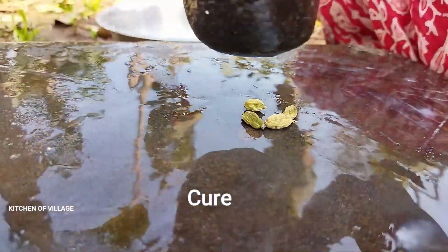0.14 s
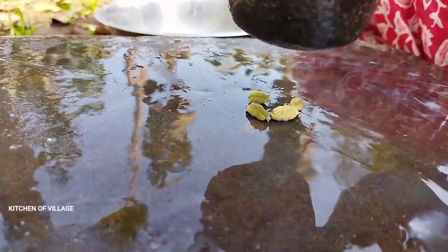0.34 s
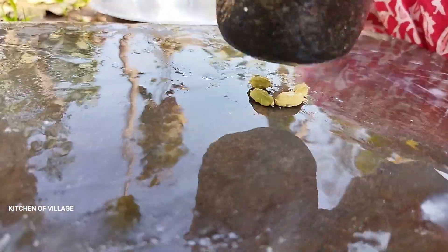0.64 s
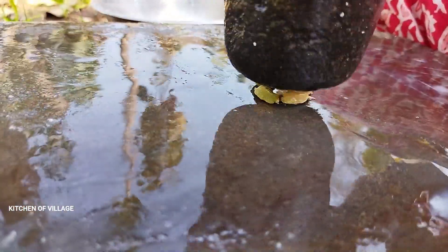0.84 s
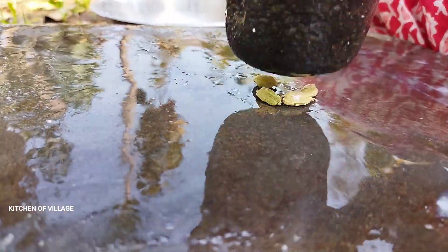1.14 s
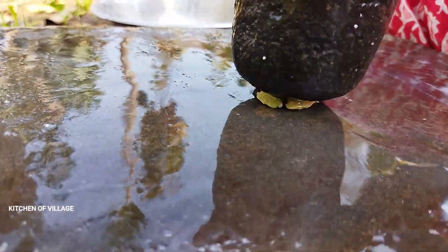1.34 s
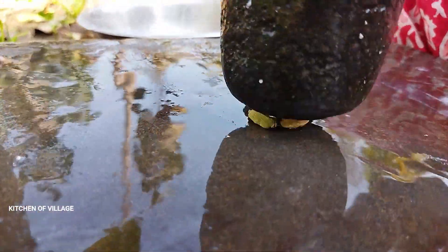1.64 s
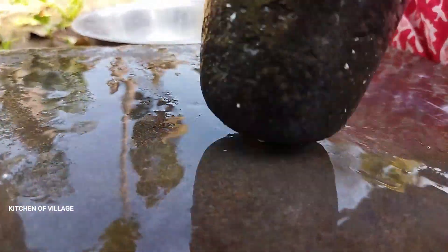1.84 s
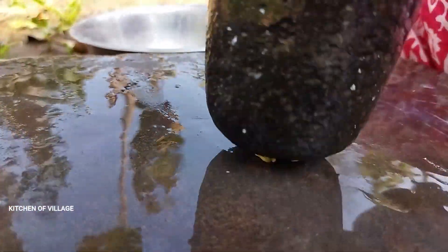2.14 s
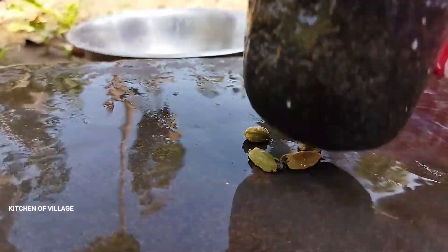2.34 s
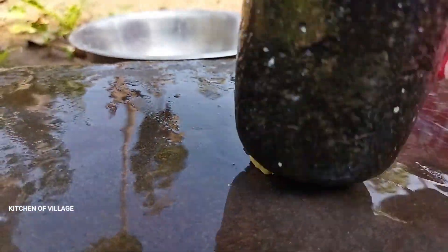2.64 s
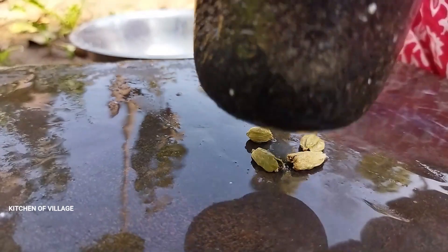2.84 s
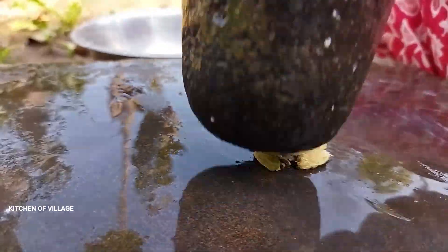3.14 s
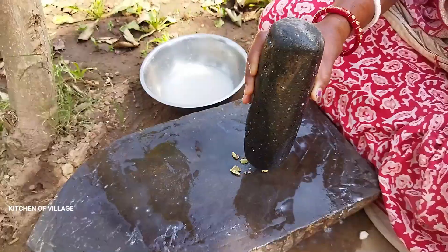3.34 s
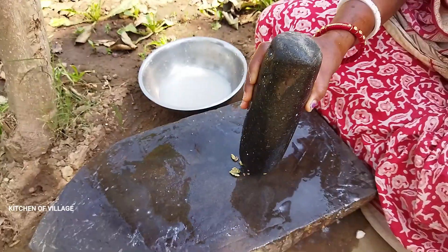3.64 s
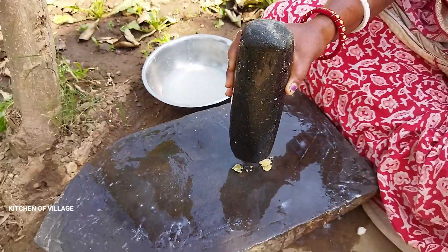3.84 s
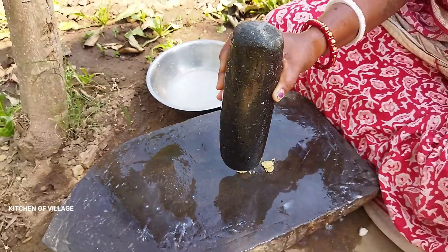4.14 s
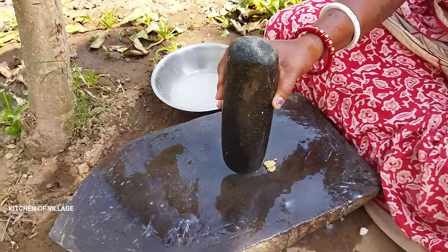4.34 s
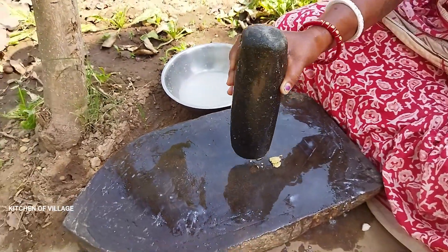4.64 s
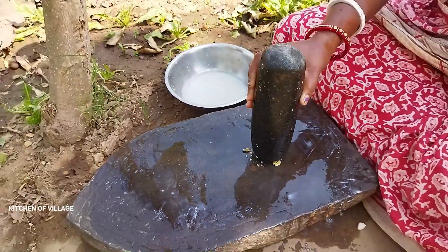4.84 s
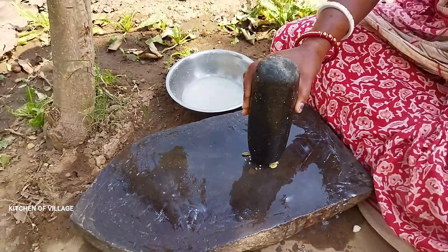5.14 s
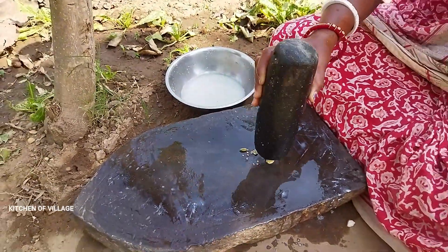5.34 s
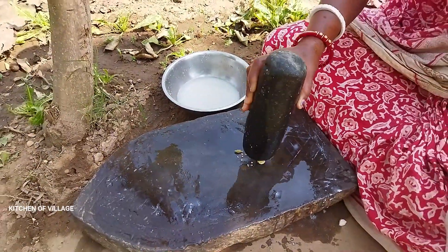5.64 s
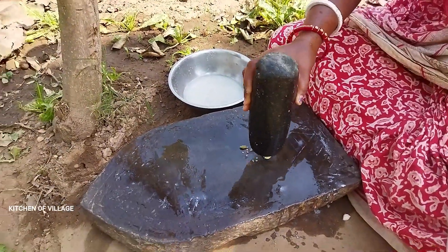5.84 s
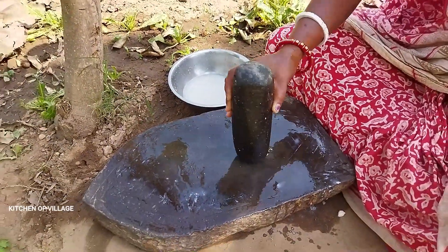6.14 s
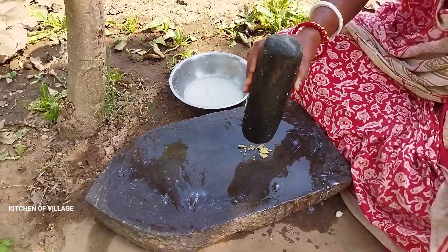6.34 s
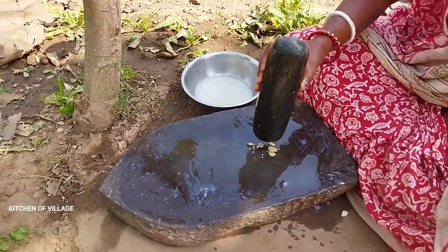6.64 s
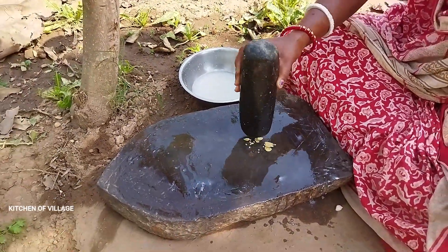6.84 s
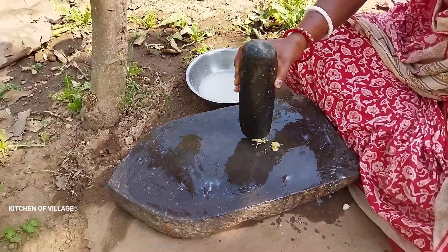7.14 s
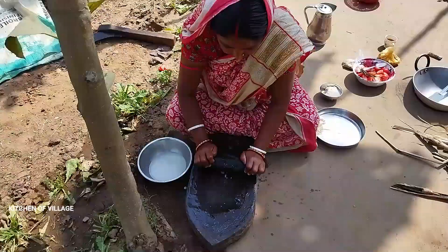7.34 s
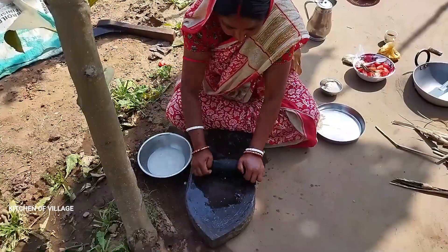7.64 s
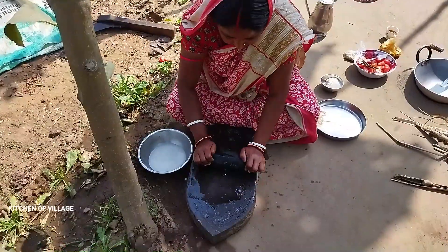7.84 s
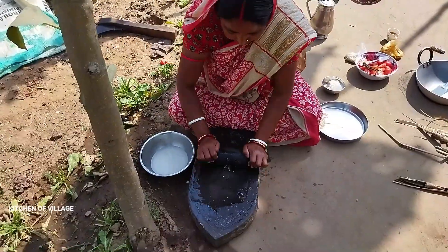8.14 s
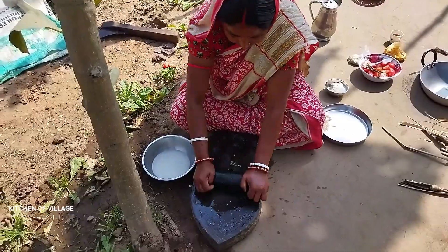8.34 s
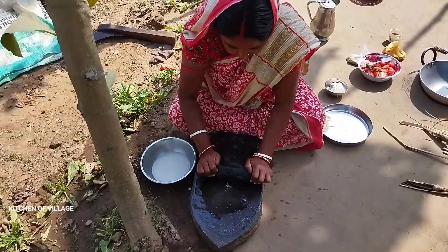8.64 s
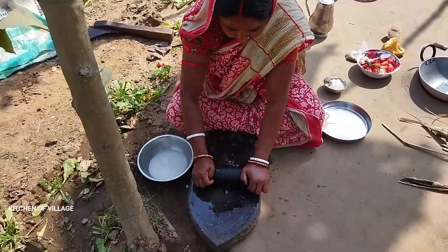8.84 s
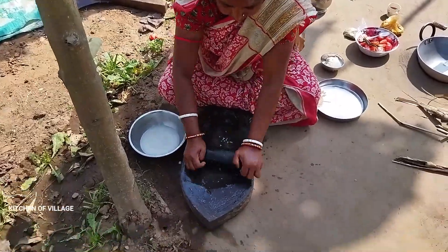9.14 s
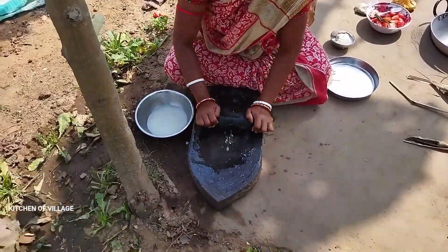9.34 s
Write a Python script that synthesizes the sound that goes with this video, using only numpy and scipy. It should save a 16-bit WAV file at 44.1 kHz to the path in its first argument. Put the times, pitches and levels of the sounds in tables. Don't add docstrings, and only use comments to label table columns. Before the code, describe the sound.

Steady close stone knocks with crisp pod cracks grow more distant, then give way to irregular stone rocking, gritty crunches and low rubbing outdoors.

```python
import sys
import numpy as np
from scipy import signal
from scipy.fft import rfft, irfft, next_fast_len
from scipy.io import wavfile
from scipy.ndimage import uniform_filter1d, minimum_filter1d

SR = 44100
rng = np.random.default_rng(int(sys.argv[2]) if len(sys.argv) > 2 else 0)


def int16_out(signal):
    q = np.round(np.clip(np.atleast_2d(signal).T, -1, 1) * 32767)
    wavfile.write(sys.argv[1], SR, q.astype(np.int16))


def volts_from_db(level):
    exponent = np.asarray(level, float) / 20
    return 10 ** exponent


N = 418509

CLOSE_UNTIL_S, LEAD_S = 3.35, .006
CLOSE_LAG_MS, FAR_LAG_MS = 1.04, 0.09
CLOSE_CONTACT_MS, FAR_CONTACT_MS = 2.286, 1.373
CLOSE_CLACK_DB, FAR_CLACK_DB = -14, 6
KNOCK_THUD_DB, THUD_PER_FLAT = -30, .7
CLOSE_PAN_DB, FAR_PAN_DB, KNOCK_PAN_DB = 3.4, 3.6, 3.0
SMEAR_PER_DB = .25
# left_minus_right_db, sharpest_t60_s, dull_part_db, wet_sizzle_db
POD_CLOSE, POD_FAR, GRIT_FAR = (-4.5, .013, 7, -47), (-3.5, .011, 3, -49), (4.5, .012, 7, -56)

# time_s, level_db
YARD_LEVEL = [(0.0, -50), (0.9, -56), (2.88, -57), (3.46, -56), (3.78, -53.5), (4.2, -52.5), (4.81, -56),
              (5.34, -53), (6.02, -53.5), (6.24, -58.5), (6.79, -53.5), (7.27, -59), (7.61, -55.5),
              (9.49, -54)]
# pitch_hz, density_db_per_hz
YARD_RUMBLE = [(15, -77.5), (25, -40.5), (56, -12.5), (91, -3.5), (216, -4.5), (303, -6.5), (461, -11.5),
               (670, -16.5), (1200, -55.5), (1560, -40), (2640, -120)]
# time_s, level_db
LEAVES_LEVEL = [(0, -11.5), (.9, -16), (3.45, -14), (3.65, -10), (7.3, -9), (7.6, -6.5), (9.49, -6)]
# pitch_hz, density_db_per_hz
LEAF_HISS = [(410, -31.5), (700, -2.5), (1330, -2.5), (1550, -4.5), (2280, -2.5), (5540, -17), (7010, -33),
             (8000, -37.5), (10400, -42), (17600, -120)]
# time_s, level_db
FILM_LEVEL = [(0.0, -73), (0.53, -73), (1.52, -79.5), (2.36, -68), (2.55, -76), (3.9, -75.5), (4.72, -67),
              (5.16, -72), (5.31, -64), (5.63, -72), (6.1, -68.5), (6.4, -75.5), (6.65, -63.5), (7.1, -80),
              (7.4, -67), (7.91, -60), (8.77, -67), (9.08, -59), (9.49, -60)]
# pitch_hz, density_db_per_hz
FILM_FIZZ = [(2350, -26), (4000, -6), (4730, 1), (5300, -9), (6200, 0.5), (7980, -9), (9730, -4.5),
             (14100, -3.5), (15300, -9), (16200, -30), (16800, -52)]
# top_s, top_hz, fall_hz, half_length_s, level_db
BIRD_CHIRPS = [(.13, 2320, 30, .04, -54), (2.255, 4830, 300, .025, -52), (2.355, 4430, 500, 0.022, -49),
               (2.383, 4050, 700, 0.013, -49), (2.424, 4500, 500, .02, -57), (2.499, 5050, 600, 0.019, -48),
               (2.515, 4100, 500, .008, -54), (2.545, 3600, 500, 0.02, -53),
               (2.635, 4910, 900, 0.035, -56.5), (2.822, 5100, 705, 0.014, -54),
               (2.863, 4740, 900, 0.017, -50.5), (2.944, 3720, 400, .015, -59)]
# pitch_hz, t60_s, level_db, lean_left_db, extra_close_db
STRUCK_PARTS = [
    [(194.4, 0.033, 4.5, 0, -2.2), (125, 0.076, -7.5, -2.5, -6), (270.4, 0.02, -6.5, -13, 0.5),
     (472, 0.028, -14, 1, 15)],
    [(642, 0.022, 3.5, 1.5, -3), (750, 0.058, -17, -8, -10)],
    [(1124, 0.012, 0.5, 0, 5.6), (2584, 0.023, -21.5, -6, -1), (3150, 0.011, -17.5, 0.5, -6.5),
     (1460, 0.18, -28, -2.5, -3), (900, .016, -4.5, -9, -2.5), (1305, 0.045, -12.5, 4, -3)],
    [(1563.4, 0.023, 3.5, 1.63, -1.7), (1730, 0.053, -22.5, 0, -4.3), (1997, .03, -26, -16.5, -0.5),
     (2350, 0.005, -18, -4.5, -3.5)],
]
# start_s, force_db, off_centre_db, bare_stone_db
POUNDS_NEAR = [(0.5687, -13, 0, -20), (0.8576, -31, -5, -4), (1.1367, -21.5, -4.5, -15),
               (1.4024, -3, -17, -26), (1.6643, -16.5, -2, -6), (1.9301, -4.5, -8, -21),
               (2.1975, -4, -3, -10), (2.4616, -6.5, 5.5, -8), (2.7189, -6.5, 1.5, -13),
               (2.9821, -7.5, -13.5, -15), (3.2586, -16, -2, -9)]
POUNDS_AWAY = [(3.4508, -15.5, 4.5, -25), (3.724, -15.5, -4, -35), (4.0081, -13, 1, -15),
               (4.2723, -10.5, -2.5, -13), (4.5462, -11, 4, -6), (4.8496, -10, 2, -27),
               (5.1349, -13.5, 7.5, -11), (5.4579, -15.5, -3, -35), (5.7493, -15.5, -3.5, -45),
               (6.1685, -17.5, 8.5, 9), (6.508, -12.5, 5.5, -14), (6.7736, -13.5, 10.5, -3),
               (7.0726, -18.5, 12.5, 9)]
# start_s, force_db, flatness_db, off_centre_db
PESTLE_KNOCKS = [(7.097, -39, 11, 15), (7.3509, -3, -9, -12.5), (7.505, -27.5, -29, -19),
                 (7.5193, -4, -26, -19), (7.7573, -2, -5, -9), (7.9287, -26.5, -17, 0),
                 (8.1512, 4, -6.5, -15), (8.172, -19.5, -23, -28), (8.5567, 0.5, -5, -14),
                 (8.578, -28, -16, -15), (8.621, -36, -20, 0), (8.745, -8, -24, -18),
                 (8.9501, -13, -3.5, -7.5), (9.131, -40, -22, -21), (9.148, -6, -31, -16),
                 (9.2636, -20, -8, -14), (9.3576, -1, -3.5, -13.5)]
# start_s, pitch_hz, level_db
AIR_PUFFS = [
    (.572, 45, -17.5),
    (0.5707, 2980, 8.5),
    (.858, 45, -20.5),
    (1.666, 45, -21),
    (3.261, 45, -40),
]
# start_s, peak_db, above_8khz_db
CRACKS_NEAR = [(0.5702, -2.5, 0), (0.855, -1, 2.5), (1.1374, -2.5, -4), (1.3978, -10, -4),
               (1.4337, -34.5, 4), (1.6662, -4.5, -3.5), (1.9291, -4, -1), (2.1975, -3, 0),
               (2.4594, -14, 0), (2.7188, -11.5, -0.5), (2.9807, -10, -2.5), (3.2566, -6.5, 0)]
CRACKS_AWAY = [(3.4476, -23.5, -0.5), (3.7215, -20, 0), (3.8318, -19, 0), (3.8737, -25.5, 0),
               (4.0044, -29, -5), (4.2703, -20, -5), (4.5451, -20, -4), (4.7297, -32.5, -1),
               (4.8474, -14.5, -3), (5.1333, -24, 0), (5.4546, -13, -2), (5.7469, -22.5, -1),
               (5.8372, -33, 0), (5.9325, -37, -4), (6.1679, -25, -5), (6.5047, -27.5, -4.5),
               (6.7731, -17, -3), (7.0719, -23, 0)]
GRIT_CRUNCHES = [(7.3617, -37.5, -5), (7.3755, -35, -4.5), (7.483, -22, -2), (7.696, -41, -5),
                 (7.7544, -42, -13), (7.8102, -32.5, -4.5), (7.8911, -31.5, -3.5), (7.9404, -20.5, 0),
                 (8.0022, -37.5, 0), (8.081, -43, -4), (8.1504, -37.5, -32), (8.306, -30, 0),
                 (8.3296, -32, -0.5), (8.3493, -24, -2.5), (8.3824, -29.5, 0), (8.7022, -31, -4),
                 (8.754, -32, -2), (8.7735, -31.5, 0), (9.007, -38, -5), (9.1143, -29.5, 0),
                 (9.1362, -23.5, -2.5), (9.1771, -23.5, 0), (9.2773, -37, -2)]
# pitch_hz, level_db
SNAP_DULL = [(900, -32.5), (1500, -10.5), (2300, -12), (3800, -5), (5500, -6.5), (7500, -16.5),
             (10000, -47.5)]
# pitch_hz, level_db
POD_BRIGHT = [(4500, -37.5), (7800, -8), (10100, -4), (11700, -4), (13000, -1.5), (15200, -11.5),
              (16800, -34.5)]
# pitch_hz, level_db
GRIT_BRIGHT = [(5000, -33.5), (8400, -10), (9200, 7), (10000, -1.5), (11000, 1), (12700, -14.5),
               (15300, -1), (16600, -19)]
# pitch_hz, width_hz, level_db
SPLITTER_EDGES = [
    (6700, 110, 2),
    (10780, 230, -2),
]
# pitch_hz, share
DROPOUT_ODDS = [(3000, 0.032), (4500, 0.16), (5400, 0.42), (6300, 0.23), (7100, .4), (8000, 0.002),
                (10000, 0.2), (11400, 1), (12500, 0), (16000, .2)]
# time_s, level_db
RUB_LEVEL = [(6.1, -70.5), (6.55, -74), (7.39, -63), (7.55, -63), (7.74, -53.5), (7.97, -59.5), (8.59, -63),
             (8.73, -54), (9.49, -55)]
# pitch_hz, level_db
PESTLE_SONG = [(500, -40), (660, 2.5), (950, -16), (1350, -11.5), (1570, 7), (1800, -9.5), (2400, -34)]
# start_s, pitch_hz, t60_s, level_db
BANGLE_TINKS = [
    (6.167, 4860, 0.042, -22.5),
    (7.688, 6160, 0.047, -44),
]


def colour(x, points):
    size = next_fast_len(x.shape[-1])
    hz, db = np.transpose(points)
    bins_hz = np.arange(size // 2 + 1) * SR / size
    gain = volts_from_db(np.interp(np.log(bins_hz + 1), np.log(hz), db, -90, -90))
    gain = gain / np.sqrt(np.mean(gain ** 2))
    return irfft(rfft(x, size) * gain, size)[..., :x.shape[-1]]


def walk(rate):
    k = int(SR / rate)
    held = np.repeat(rng.standard_normal(N // k + 1), k)
    return uniform_filter1d(uniform_filter1d(held, k), k)[:N]


def curve(table):
    s, db = np.transpose(table)
    return volts_from_db(np.interp(np.arange(N) / SR, s, db, -120, -120))


def ragged(count, spread_db, hold):
    return volts_from_db(spread_db * rng.exponential(size=count // hold + 1)).repeat(hold)[:count]


def add(out, s, pair, pan_db):
    i = int(s * SR)
    panned = pair * volts_from_db(np.array([[pan_db], [-pan_db]]) / 2)
    out[:, i:i + pair.shape[1]] += panned[:, :N - i]


def noise(points, shared, flicker_db, grit_db=0.):
    mid, side = rng.standard_normal((2, N)) * ragged(N, grit_db, 32)
    pair = mid + (1 - shared) * side * np.array([[1], [-1]])
    pair = colour(pair, points) * volts_from_db(flicker_db * walk(25))
    return pair / np.sqrt(np.mean(pair.mean(0) ** 2))


def holes(x, depth_db):
    hz, _, z = signal.stft(x, SR, nperseg=1024)
    odds = np.interp(hz, *np.transpose(DROPOUT_ODDS))[:, None]
    draw = rng.random((len(hz) // 8 + 1, z.shape[2] // 3 + 1))
    patch = draw.repeat(8, axis=0).repeat(3, axis=1)[:len(hz), :z.shape[2]]
    gain = np.where(patch < odds, volts_from_db(depth_db), volts_from_db(8.9 * (patch - .5)))
    return signal.istft(z * gain, SR, nperseg=1024)[1][:, :N]


def yard_murmur():
    return curve(YARD_LEVEL) * volts_from_db(1.45) * noise(YARD_RUMBLE, 0.5, 2.5)


def leaf_hiss():
    return curve(YARD_LEVEL) * curve(LEAVES_LEVEL) * volts_from_db(6) * noise(LEAF_HISS, .03, 1.5)


def wet_film():
    grit = volts_from_db(14 * walk(50)) * noise(GRIT_BRIGHT, .3, 3, 2)
    fizz = noise(FILM_FIZZ, .05, 2.5)
    return curve(FILM_LEVEL) * (volts_from_db(5) * fizz + grit * volts_from_db([[-6], [-9]]))


def birds():
    out = np.zeros(N)
    for s, top_hz, fall_hz, half, db in BIRD_CHIRPS:
        u = np.linspace(-1, 1, int(2 * half * SR))
        tone = np.sin(2 * np.pi * np.cumsum(top_hz - fall_hz * u ** 2) / SR)
        out[int((s - half) * SR):][:len(u)] += volts_from_db(db) * np.sqrt(1 - u ** 2) * tone
    out = out * (1 + 1.3 * walk(210))
    t = np.arange(SR // 8) / SR
    trees = rng.standard_normal((2, len(t))) * volts_from_db(-60 * t / 0.2 - 32.5)
    return out * volts_from_db(-6.5) + signal.fftconvolve(out[None], trees, axes=1)[:, :N]


def ring(t, hz, t60, turn=0., contact_s=0.00063):
    u = t - contact_s - .28 / hz
    rise = np.exp(-(u / (0.25 / hz + 0.64 * contact_s)) ** 2)
    decay = volts_from_db(-60 * np.maximum(u, 0) / max(t60, .003))
    return np.where(u < 0, rise, decay) * np.cos(2 * np.pi * hz * u + turn)


def pounds(rows, clack_db, pan_db):
    return [(s, db, db + off, db + bare + clack_db, db + bare, pan_db) for s, db, off, bare in rows]


def strokes():
    knocks = []
    for s, db, flat, off in PESTLE_KNOCKS:
        thud_db = db + KNOCK_THUD_DB + THUD_PER_FLAT * flat
        knocks.append((s, thud_db, db + off, db + flat, db, KNOCK_PAN_DB))
    near = pounds(POUNDS_NEAR, CLOSE_CLACK_DB, CLOSE_PAN_DB)
    return near + pounds(POUNDS_AWAY, FAR_CLACK_DB, FAR_PAN_DB) + knocks


def blows():
    out, t = np.zeros((2, N)), np.arange(SR // 5) / SR
    chance = rng.standard_normal((len(strokes()), 4, 6, 3))
    for (s, *part_db, pan_db), luck in zip(strokes(), chance):
        close = s < CLOSE_UNTIL_S
        lag = np.array([[0], [CLOSE_LAG_MS if close else FAR_LAG_MS]]) / 1000
        contact = (CLOSE_CONTACT_MS if close else FAR_CONTACT_MS) / 1000
        hit = 0
        for modes, db, rows in zip(STRUCK_PARTS, part_db, luck):
            for (hz, t60, mode_db, lean_db, close_db), (pitch, level, phase) in zip(modes, rows):
                turn = np.array([[0], [.25 * phase]])
                lean = np.array([[lean_db], [-lean_db]])
                gain = volts_from_db(db + mode_db + close * close_db + level + lean)
                hit = hit + gain * ring(t - LEAD_S - lag, hz * (1 + pitch / 60), t60, turn, contact)
        order, low_hz = (2, 90) if close else (3, 95)
        hit = signal.sosfilt(signal.butter(order, low_hz, "high", fs=SR, output="sos"), hit)
        bursts = ragged(len(t), 1.0, 64)
        scatter = rng.standard_normal((2, len(t))) * bursts * volts_from_db(-60 * t / 0.1)
        scatter = scatter * np.minimum(t / 0.0027, 1) ** 2
        wet = signal.fftconvolve(hit, scatter, axes=1)[:, :len(t)]
        wet = signal.lfilter([1, -.6], 1, wet)
        add(out, s - LEAD_S - .0008, hit * volts_from_db(-3 - pan_db / 2) + wet * volts_from_db(-39), pan_db)
    for s, hz, db in AIR_PUFFS:
        u = (t - .03) * hz * 2 * np.pi
        add(out, s - .03, np.tile(volts_from_db(db) * u * np.exp(-u ** 2), (2, 1)), 1.5)
    return out


def snaps(events, bright, pan_db, sharp_t60, dull_db, sizzle_db):
    out, t = np.zeros((2, 2, N)), np.arange(-SR // 50, SR // 6) / SR
    for s, db, high_db in events:
        t60 = np.clip(sharp_t60 * volts_from_db(-SMEAR_PER_DB * db), .003, .08)
        shape = np.where(t < .002, volts_from_db(60 * (t - .002) / (.55 * t60)), volts_from_db(-60 * t / t60))
        grains = ragged(len(t), 3, 16)
        mid, own = rng.standard_normal(len(t)), rng.standard_normal((2, 2, len(t)))
        ports = np.array([mid, np.roll(mid, rng.integers(-12, 12))])
        burst = shape * grains * (ports + own[0] / 4)
        burst = burst / np.sqrt(np.sum(burst ** 2) / (SR * t60))
        swell = np.clip(t / 0.023, 0, 1) * np.exp(-(t / 0.077) ** 2)
        sizzle = swell * volts_from_db(sizzle_db - db) * own[1]
        snap_share = min(volts_from_db(high_db + 3.5), .995)
        sizzle_share = min(1.01 * snap_share, .98)
        for layer, x, share in zip(out, (burst, sizzle), (snap_share, sizzle_share)):
            dull = np.sqrt(1 - share ** 2) * volts_from_db(dull_db) * colour(x, SNAP_DULL)
            add(layer, s - .02, (share * colour(x, bright) + dull) * volts_from_db(db - 11), pan_db)
    return out


def cracks():
    pods = snaps(CRACKS_NEAR, POD_BRIGHT, *POD_CLOSE) + snaps(CRACKS_AWAY, POD_BRIGHT, *POD_FAR)
    snap, sizzle = pods + snaps(GRIT_CRUNCHES, GRIT_BRIGHT, *GRIT_FAR)
    ahead = 0
    for hz, width_hz, db in SPLITTER_EDGES:
        b, a = signal.iirpeak(hz, hz / width_hz, SR)
        ahead = ahead + volts_from_db(db) * signal.lfilter(b, a, snap[:, ::-1])
    return snap + ahead[:, ::-1] + holes(sizzle, -26)


def pestle_rub():
    stick_slip = volts_from_db(4 * walk(12)) * noise(PESTLE_SONG, .3, 3, 1.5)
    return curve(RUB_LEVEL) * stick_slip * volts_from_db([[.6], [-2.5]])


def bangles():
    out, t = np.zeros((2, N)), np.arange(SR // 5) / SR
    for s, hz, t60, db in BANGLE_TINKS:
        add(out, s, np.tile(volts_from_db(db) * ring(t, hz, t60), (2, 1)), -1.5)
    return out


def scene():
    background = yard_murmur() + holes(leaf_hiss() + wet_film(), -29) + birds()
    return background + blows() + cracks() + pestle_rub() + bangles()


def roll_off(x):
    return signal.sosfilt(signal.butter(12, 16960, fs=SR, output="sos"), x)


def record(dry):
    room_left = minimum_filter1d(1 / np.maximum(np.abs(dry).max(0), 1), size=129)
    return roll_off(dry * uniform_filter1d(room_left, size=65))


dry = scene()
out = record(dry)
int16_out(out)
```